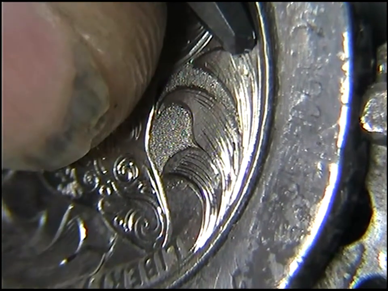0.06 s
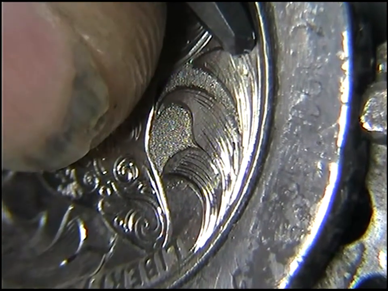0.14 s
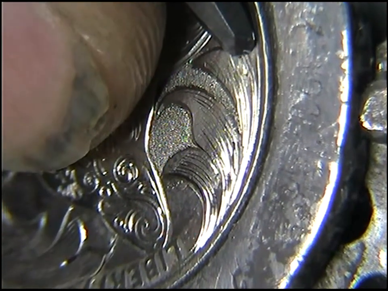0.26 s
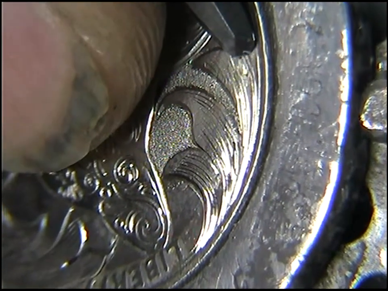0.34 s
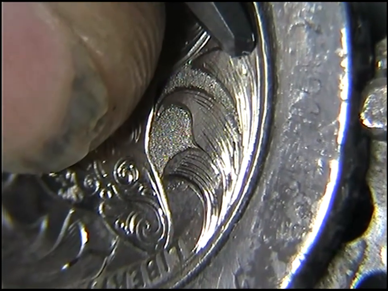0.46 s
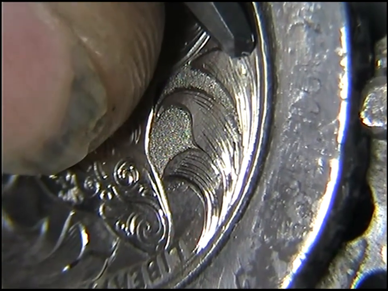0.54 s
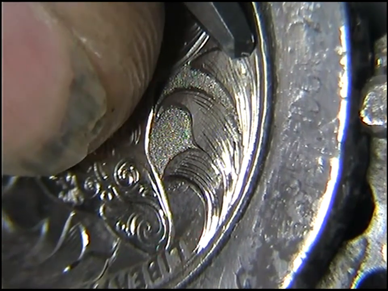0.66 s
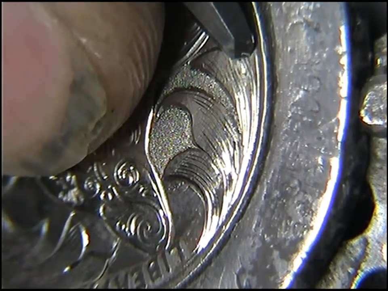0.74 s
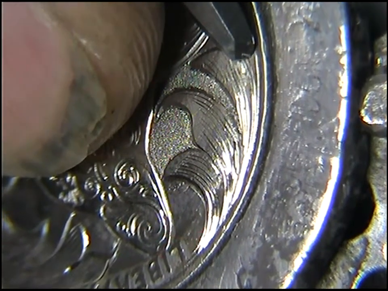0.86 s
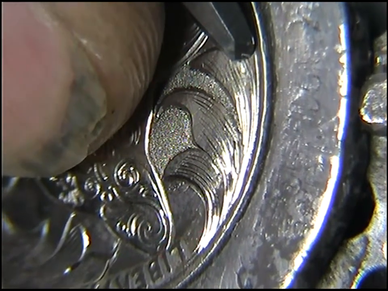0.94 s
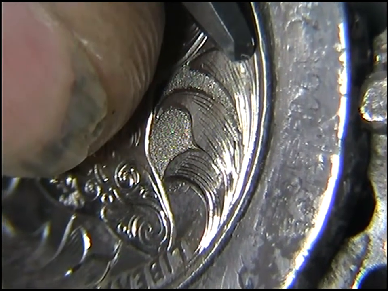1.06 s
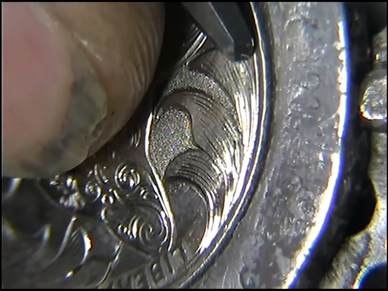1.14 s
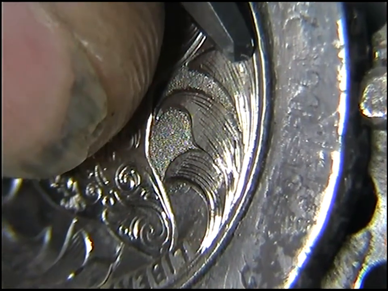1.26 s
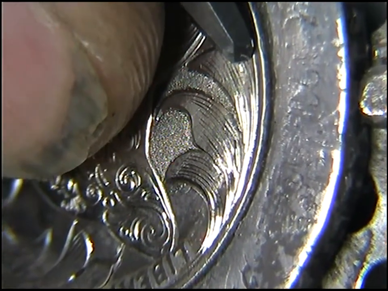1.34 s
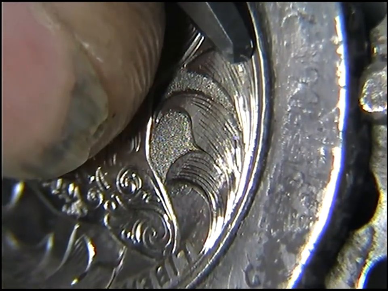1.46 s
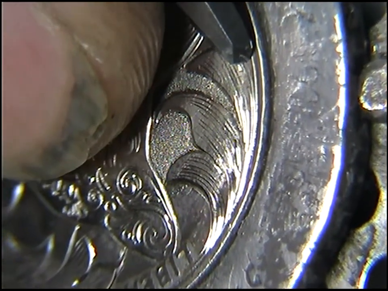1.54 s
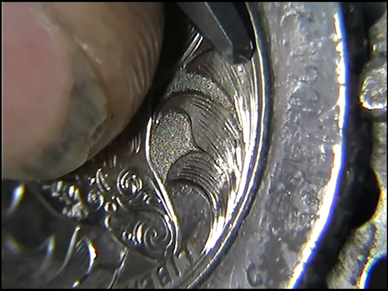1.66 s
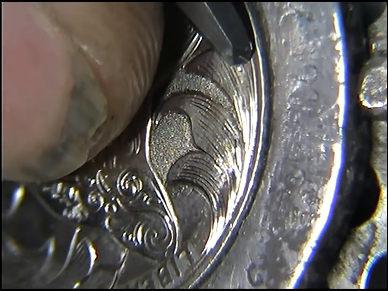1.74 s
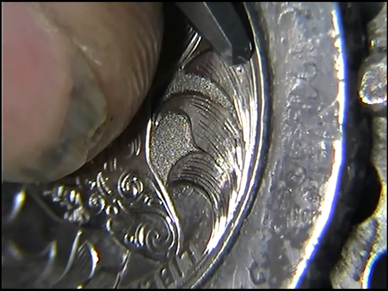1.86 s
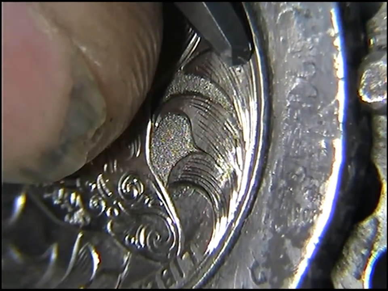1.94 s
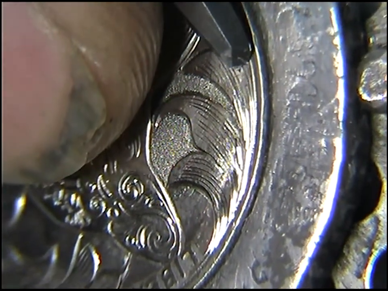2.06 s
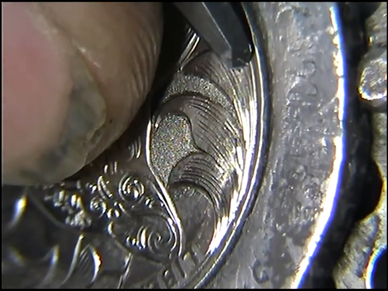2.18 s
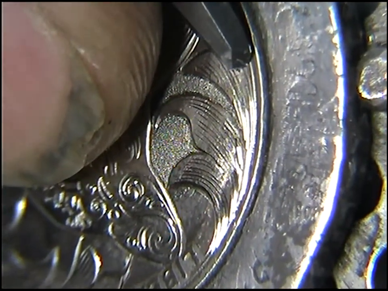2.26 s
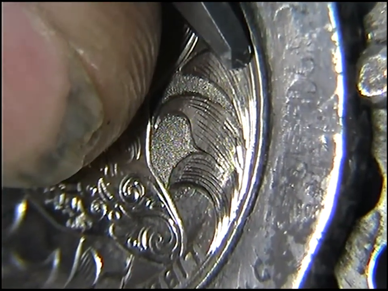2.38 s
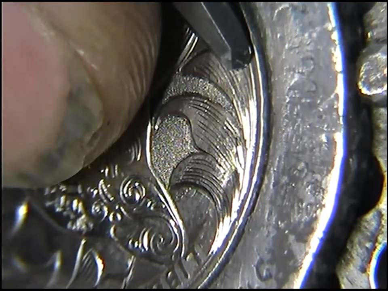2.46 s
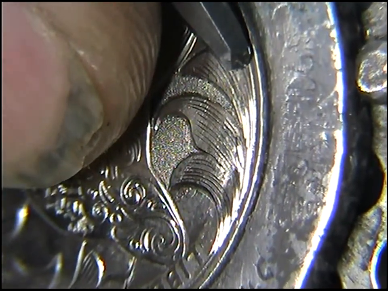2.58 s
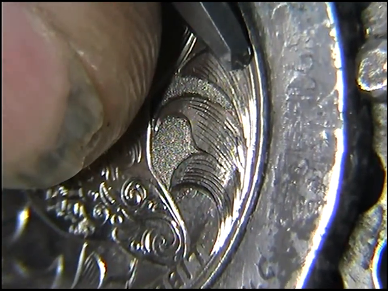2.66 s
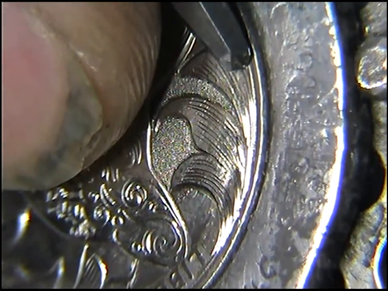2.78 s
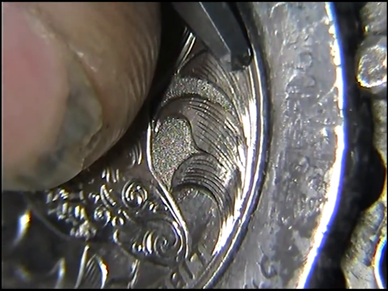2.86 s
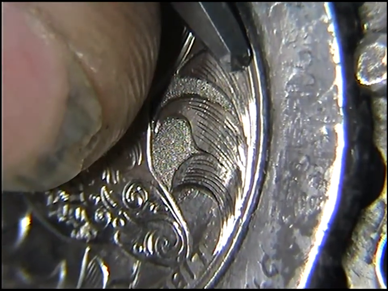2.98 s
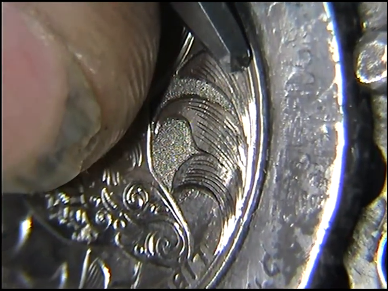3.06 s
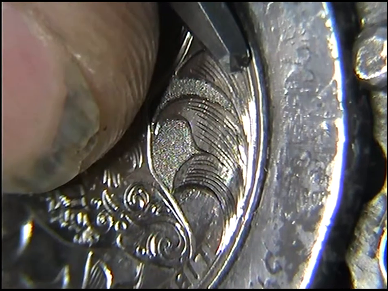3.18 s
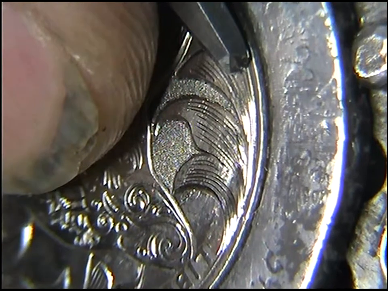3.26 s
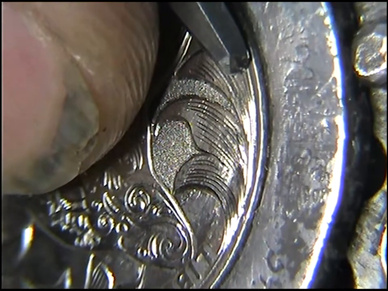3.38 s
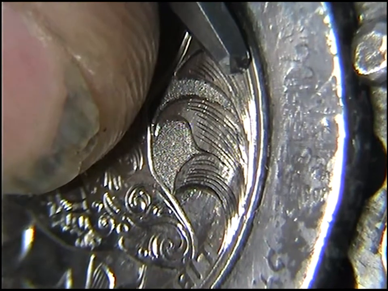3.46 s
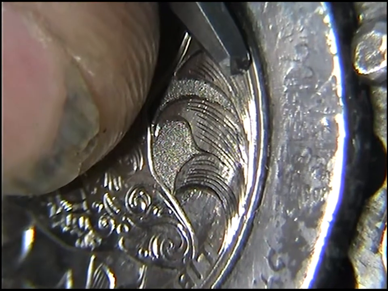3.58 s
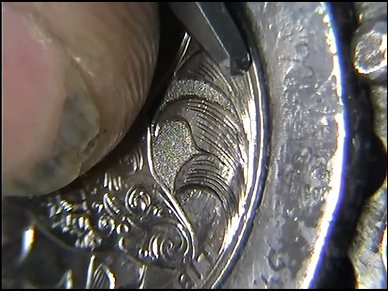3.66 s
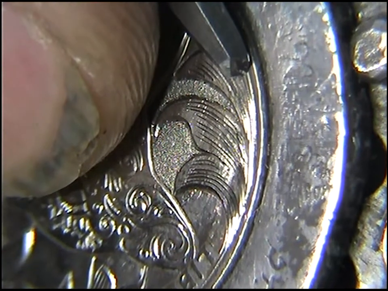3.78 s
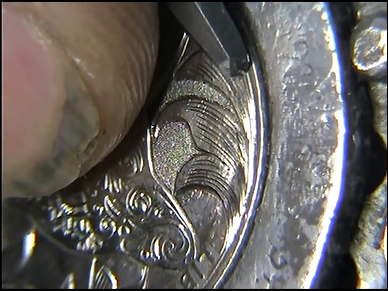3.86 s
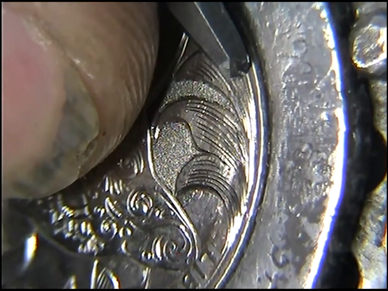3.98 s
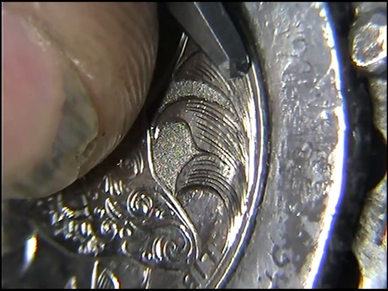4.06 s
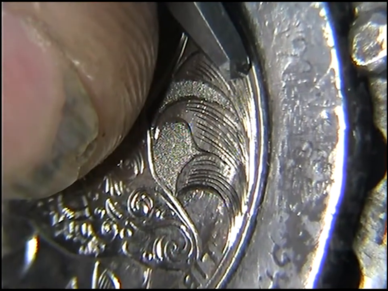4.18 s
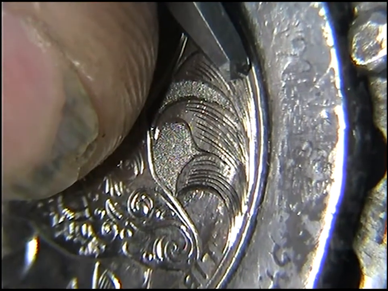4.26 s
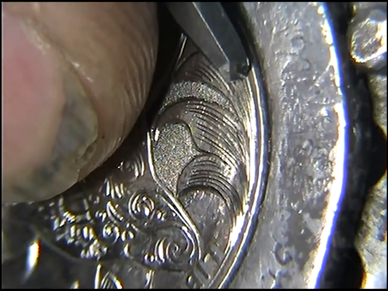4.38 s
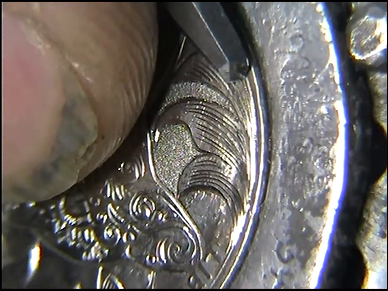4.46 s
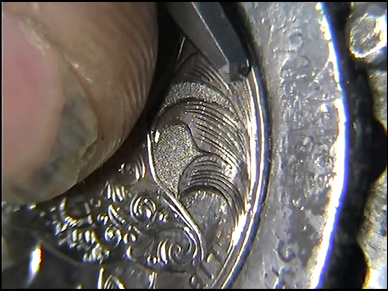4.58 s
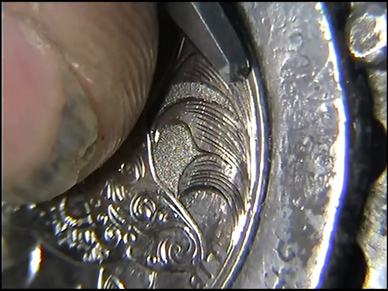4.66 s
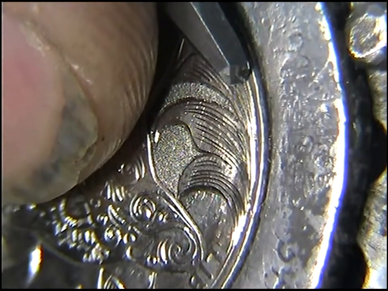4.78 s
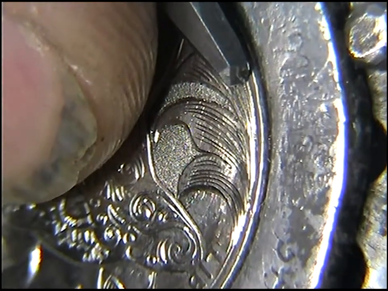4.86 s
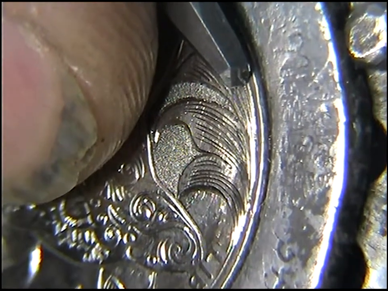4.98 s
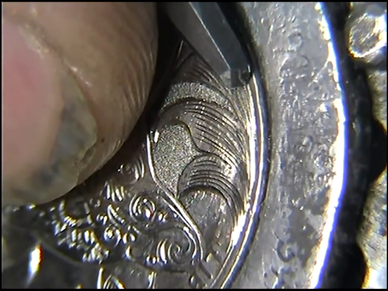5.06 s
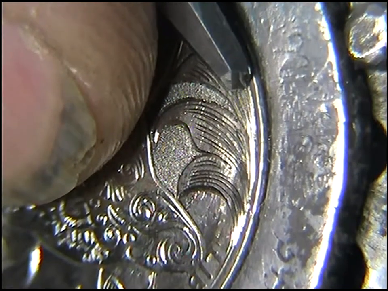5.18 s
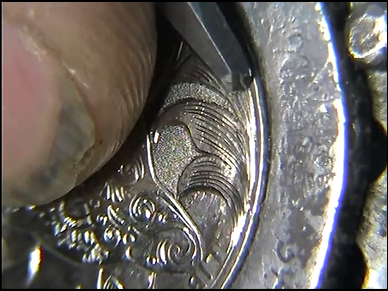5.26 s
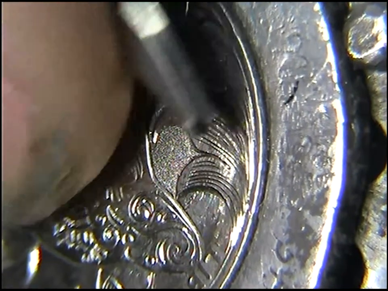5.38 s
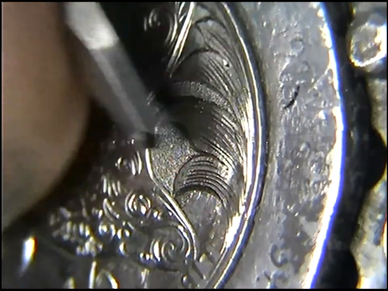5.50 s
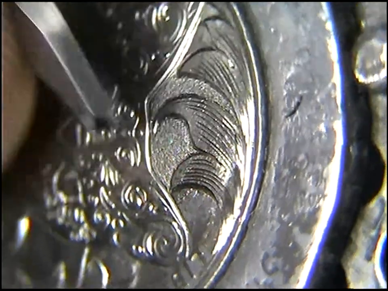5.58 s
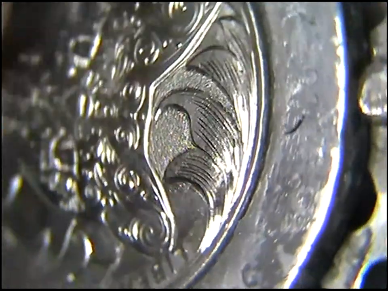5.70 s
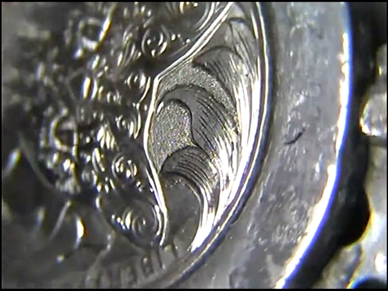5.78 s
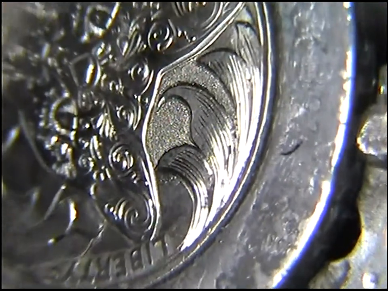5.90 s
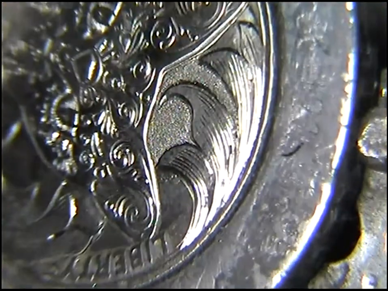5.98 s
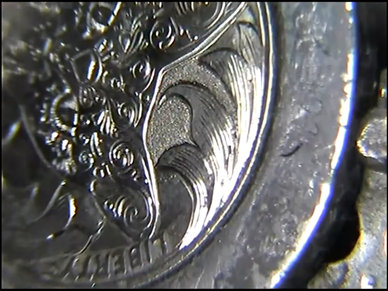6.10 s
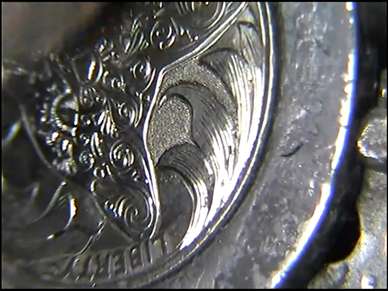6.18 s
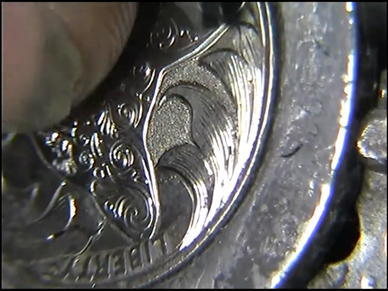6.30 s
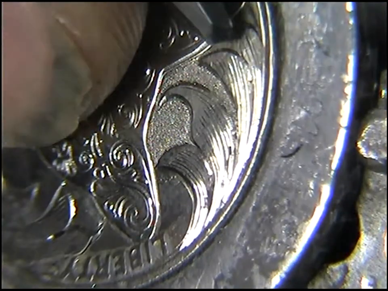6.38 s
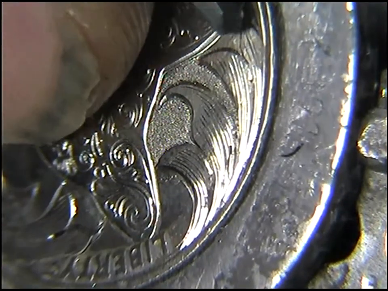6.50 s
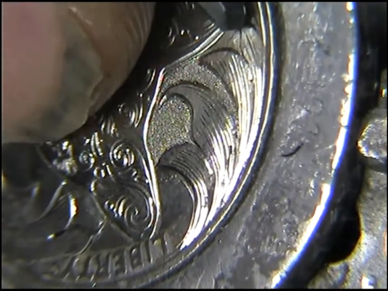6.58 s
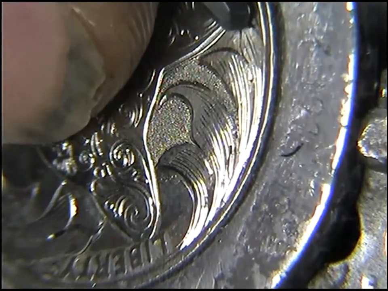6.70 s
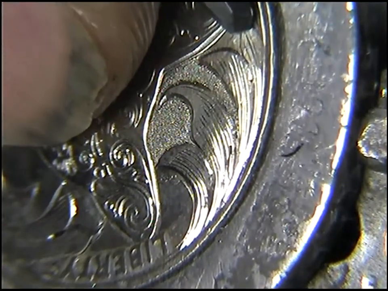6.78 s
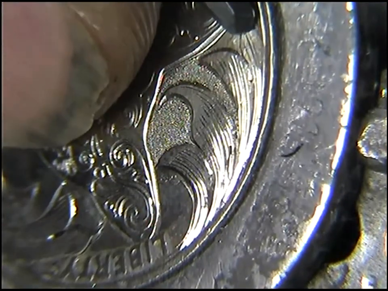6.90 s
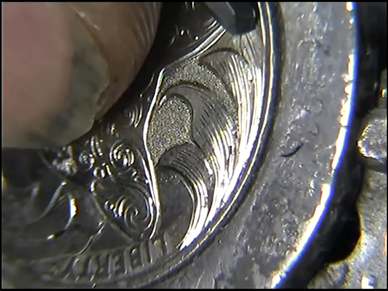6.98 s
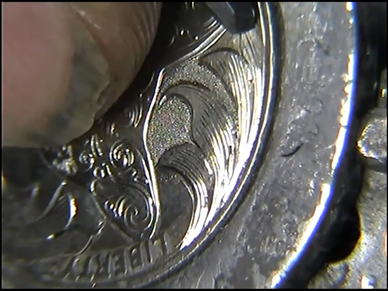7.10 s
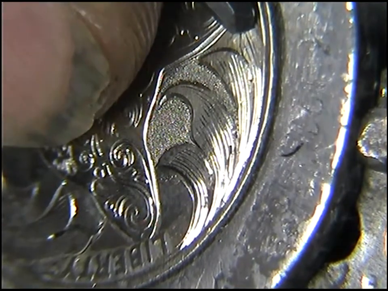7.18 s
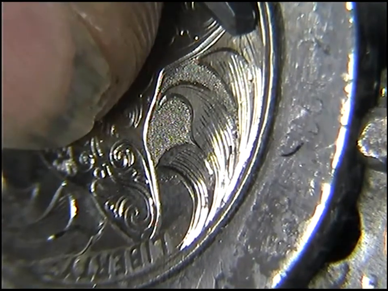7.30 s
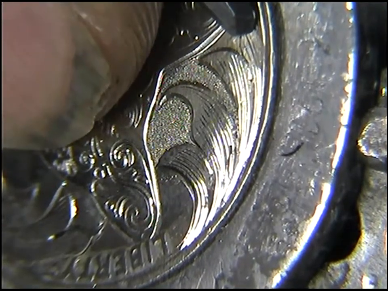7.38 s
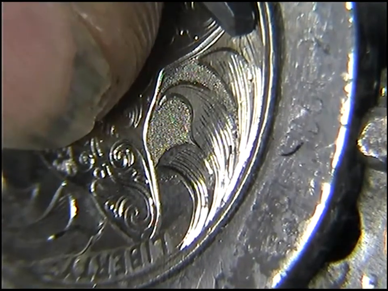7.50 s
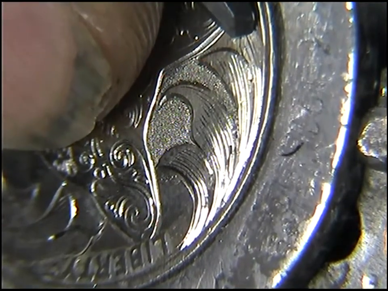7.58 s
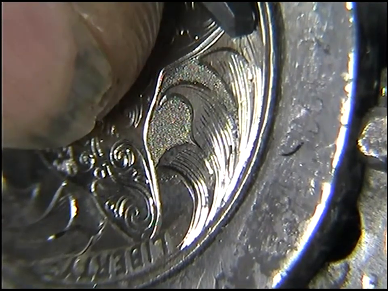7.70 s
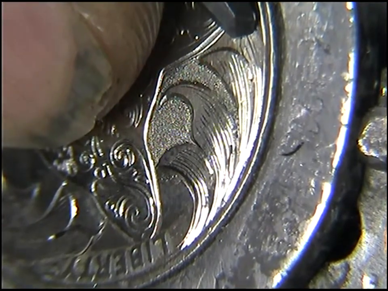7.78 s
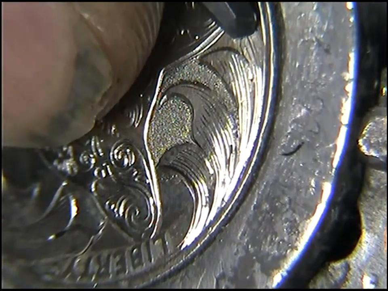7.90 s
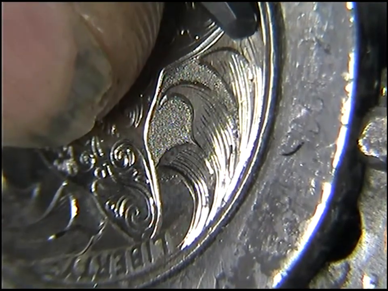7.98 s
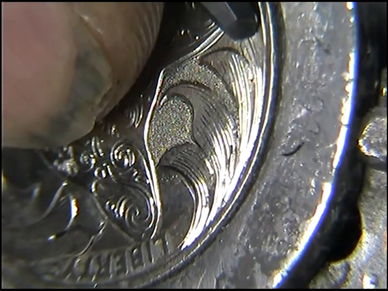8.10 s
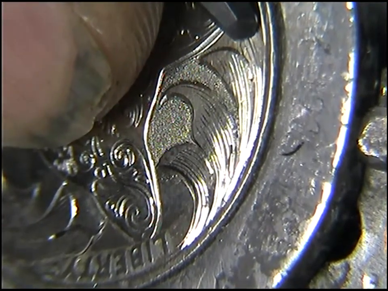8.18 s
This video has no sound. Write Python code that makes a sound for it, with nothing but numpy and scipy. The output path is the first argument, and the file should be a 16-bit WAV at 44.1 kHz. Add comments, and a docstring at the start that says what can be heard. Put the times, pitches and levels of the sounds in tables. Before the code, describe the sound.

From the start a dense, hard metallic buzz fills the foreground, roughly 51 blows a second, ringing brightly around one to three and a half kilohertz with gritty scraping on each blow. Steady exhaust hiss, a small motor's hum near 318 hertz and a low compressor drone lie behind. At 1.0 seconds the compressor cuts out with a short airy puff, then shudders in low, soft lurches until about 2.3, while the hum sags slightly. From 2.5 to 4.6 the buzz gradually changes colour, losing some upper ring; it bites from 4.3, then eases just before 5.3. The tool lifts: a looser, clacking rattle swings close around 5.6 and fades, with hiss and hum more exposed. Near 6.8 a faint buzz returns, swelling steadily and growing firmer after 7.7 to the end. Close stereo microphone, small dry workshop, source slightly right.

```python
"""A dense buzz is heard first: an air-driven graver strikes a coin in a vise about 51 times a second.
Each blow is an impulse that rings the modes of graver, coin and vise; the ring shifts as the cut deepens.
Behind it exhaust air hisses as filtered noise, and a motor and a compressor hum as sums of partials.
After a second the compressor stops with a puff and a shudder. Later the graver lifts off, rattles free
as it swings past the microphone, grows fainter, then touches the metal again with swelling blows."""
import sys
import numpy as np
from scipy import signal
from scipy.fft import rfft, irfft
from scipy.io import wavfile

SR = 44100
rng = np.random.default_rng(int(sys.argv[2]) if len(sys.argv) > 2 else 0)


def bounce(signal):
    """Save signal as a 16-bit WAV file at the path given by the first command-line argument."""
    frames = np.transpose(np.atleast_2d(signal))
    limited = np.clip(frames, -1, 1)
    pcm = np.round(limited * 32767).astype(np.int16)
    wavfile.write(sys.argv[1], SR, pcm)


N = 363825
T = np.arange(N) / SR  # time [s]
LIFT_S, UNCOVER_S = 5.331, .12  # the point leaves the metal; time the hand takes to come off the work
PUMP_STOP_S = 1.022


def undb(db):
    """Logarithmic level: decibels become an amplitude gain."""
    return 10 ** (np.asarray(db) / 20)


def curve(rows):
    """Linear interpolation: rows (time [s], value) are joined by straight lines."""
    return np.interp(T, *np.transpose(rows))


def ramp(start_s, length_s):
    """Linear growth: rises evenly from 0 to 1, then holds."""
    return np.clip((T - start_s) / length_s, 0, 1)


def unit(x):
    """Normalization of power: scales to rms 1."""
    return x / np.sqrt(np.mean(x ** 2))


def walk(rate):
    """Slow random modulation: straight lines join random values drawn `rate` times a second."""
    knots = rng.standard_normal(2000)
    return np.interp(T * rate, np.arange(len(knots)), knots)


def over_hz(rows, size):
    """Logarithmic frequency scale: rows (frequency [Hz], value) are read on the bins of a transform."""
    hz, value = np.transpose(rows)
    bins_hz = np.fft.rfftfreq(size, 1 / SR)
    return np.interp(np.log(bins_hz + 1), np.log(hz + 1), value)


def noise(colour, spread=.3):
    """Spectral shaping of white noise in stereo; spread is the part that differs between the ears."""
    spectrum = rfft(rng.standard_normal((2, N))) * undb(over_hz(colour, N))
    mid, side = irfft(spectrum, N)
    return unit(mid) + spread * unit(side) * np.array([[1], [-1]])


def ring(x, modes, column):
    """Modal superposition: resonances of alternating sign sum to an impulse response of unit energy."""
    f = np.fft.rfftfreq(8192, 1 / SR)
    response = 0
    for k, mode in enumerate(modes):
        hz, width = mode[:2]
        resonance = 1j * f * width / (hz ** 2 - f ** 2 + 1j * f * width)
        response = response + (-1) ** k * undb(mode[column]) * resonance
    h = irfft(response)
    return signal.oaconvolve(x, h[None] / np.linalg.norm(h), axes=1)[:, :N]


# stroke rate of the piston: (time [s], rate [Hz])
STROKE_RATE = [(0, 51.42), (3.2, 51.322), (5.6, 51.47), (6.0, 51.65), (6.6, 51.43), (8.25, 51.345)]
FIRST_BLOW_S = .0068


def strokes(swing_s, jitter_s, scatter_db):
    """Periodic impulsive excitation; the rotary valve's two ports make gaps alternately long and short."""
    turns = np.cumsum(curve(STROKE_RATE)) / SR
    stroke = np.arange(int(turns[-1]) + 1)
    chance = rng.standard_normal((len(stroke), 2))
    even_s = np.interp(stroke, turns, T) + FIRST_BLOW_S
    at = (even_s - swing_s * (-1) ** stroke + jitter_s * chance[:, 0]) * SR
    # a windowed sinc places each push between samples
    taps = at.astype(int)[:, None] + np.arange(-8, 9)
    offset = taps - at[:, None]
    shape = np.sinc(offset) * np.sinc(offset / 10)
    pushes = np.zeros(N)
    np.add.at(pushes, np.clip(taps, 0, N - 1), shape * undb(scatter_db * chance[:, 1:]))
    return unit(pushes)


def rebound(x, share, lag_s, drift_s=.00002):
    """Delayed second impact: the piston bounces; the gap drifts with the pressure of the hand."""
    echo = np.interp(T - lag_s - drift_s * walk(2.47), T, x)
    return x + share * echo


def scrape(pushes, decay_s, edge_hz):
    """Frictional noise: bright grit follows each blow as metal slides on metal, its energy decaying."""
    energy = signal.lfilter([1], [1, -np.exp(-1 / (decay_s * SR))], pushes ** 2)
    highpass = signal.butter(2, edge_hz, "high", fs=SR, output="sos")
    grit = signal.sosfilt(highpass, rng.standard_normal((2, N)))
    return unit(grit * np.sqrt(energy))


SINK_START_S, SINK_S = 2.5, 2.1


def cut_depth():
    """Steady penetration: relative depth of the point in the metal, 0 to 1."""
    return ramp(SINK_START_S, SINK_S)


# modes of graver, coin and vise pressed together:
# (frequency [Hz], width [Hz], relative level in a shallow cut [dB], in a deep cut [dB])
CUT_MODES = [(104, 29, -7.5, -5), (153.7, 8, -3.5, -1), (371, 25, 9, 9), (568.1, 6.7, 9, 11.5),
             (938, 152, 13.5, 16.5), (1169, 258, 17.5, 19.5), (1188.7, 56.3, 22.5, 26.5),
             (1318, 31, 19, 15), (1403, 154, 16, 15.5), (1595, 36, 16, 18), (1912, 98, 20, 19.5),
             (2134, 20, 17.5, 16.5), (2907, 65, 24, 25), (3140, 138, 21, 24.5), (3125, 368, 25.5, 25),
             (3307, 110, 15.5, 7), (3490, 130, 21, 9), (3548, 275, 23, 12.5), (5187, 180, 12.5, 1),
             (5330, 900, 5.5, -5), (5753, 116, 12.5, 13), (6720, 170, 6, 0.5), (7410, 330, 6, 6.5),
             (9191, 486, 16, 14.5), (9343, 654, 15, 13.5), (11970, 520, 0.2, -18), (11920, 1200, -2, -1.5),
             (13900, 500, 6.5, 9), (14450, 1500, -5.5, -6)]
# modes added when the point bites: (frequency [Hz], width [Hz], relative level [dB])
BITE_MODES = [(593, 70, 2.5), (830, 210, -3.5), (4870, 1100, -7), (6080, 770, 2.5), (6840, 360, 1.5),
              (13070, 280, -14), (13520, 820, -2.5)]
# bare clack of the piston: (frequency [Hz], width [Hz], relative level [dB])
CLACK_MODES = [(3630, 5000, 0)]
# drive of the blows, and their easing just before the lift
CUT_DB, EASE_S, EASE_DB = -23.5, .16, -3
# near the end of the cut the point bites, holds, and lets go as the blows ease
BITE_START_S, BITE_RISE_S = 4.34, 0.61
SHALLOW_BITE_DB, BITE_DB, BITE_EASE_DB = -49.5, -31.5, -5
BITE_DAMP_DB = -0.9  # the biting point damps the ring of coin and vise


def cutting():
    """Forced vibration of coupled bodies: blows pass through the point into coin and vise."""
    pushes = strokes(swing_s=.000053, jitter_s=.000012, scatter_db=.2) * (T < LIFT_S)
    blows = unit(rebound(pushes, share=0.22, lag_s=0.000604))
    grit = scrape(pushes, decay_s=.0011, edge_hz=7500)
    drive = blows + undb(1.5) * grit
    easing = ramp(LIFT_S - EASE_S, EASE_S)
    force = undb(CUT_DB + EASE_DB * easing)
    biting = ramp(BITE_START_S, BITE_RISE_S)
    bite_db = SHALLOW_BITE_DB + (BITE_DB - SHALLOW_BITE_DB) * biting
    bite = undb(bite_db + BITE_EASE_DB * easing)
    depth = cut_depth()
    shallow = ring(drive * force * (1 - depth), CUT_MODES, column=2)
    deep = ring(drive * force * depth, CUT_MODES, column=3)
    body = (shallow + deep) * undb(BITE_DAMP_DB * biting ** 2)
    clack = undb(-16.0) * ring(blows[None] * force, CLACK_MODES, column=2)
    return body - clack + ring(drive * bite, BITE_MODES, column=2)


# middle of the pass, time spent closest, and time from there until the gain has fallen by 3 dB
PASS_S, PASS_LINGER_S, PASS_WIDTH_S = 5.59, 0.14, 0.12


def nearness():
    """Inverse-distance law: gain of the handpiece as it swings in, lingers and swings away; 1 when closest."""
    away_s = np.maximum(abs(T - PASS_S) - PASS_LINGER_S / 2, 0)
    return 1 / np.hypot(1, away_s / PASS_WIDTH_S)


# spectrum of exhaust air and workshop: (frequency [Hz], relative density [dB per Hz])
AIR_COLOUR = [(18, -63), (30, -39), (153, -11.5), (233, -15), (311, -13.5), (461, -14), (721, -14.5),
              (1010, -15), (1280, -12.5), (2480, -10), (2900, -14), (3870, -12.5), (6720, -14), (9460, -16),
              (16000, -40)]
# resonances that the escaping air excites: (frequency [Hz], width [Hz], relative level [dB])
VENT_MODES = [(4200, 35, 5), (5230, 300, -4), (5910, 59, -2), (6570, 810, 2), (6700, 28, -4),
              (7240, 28, -11), (7330, 23, 5), (8600, 71, 5), (9000, 29, -2), (9600, 130, 4)]
# vents over a shallow cut, over a deep cut, uncovered, and the extra hiss when closest
VENT_SHALLOW_DB, VENT_DEEP_DB, VENT_OPEN_DB, PASS_VENT_DB = -52.5, -51, -39.5, -45


def exhaust():
    """Turbulent jet noise: spent air excites narrow vents, louder uncovered and as the handpiece nears."""
    vents = ring(rng.standard_normal((2, N)), VENT_MODES, column=2)
    uncovered = ramp(LIFT_S, UNCOVER_S)
    on_work = undb(VENT_SHALLOW_DB + (VENT_DEEP_DB - VENT_SHALLOW_DB) * cut_depth())
    in_air = undb(VENT_OPEN_DB) + undb(PASS_VENT_DB) * nearness() ** 2
    steady = noise(AIR_COLOUR, spread=0.41) * undb(-39.5 + .5 * walk(6.6))
    return steady + vents * (on_work * (1 - uncovered) + in_air * uncovered)


# partials of the motor: (multiple of the hum frequency, relative level [dB])
HUM_PARTIALS = [(.575, -69), (1, -51), (2, -60), (2.293, -55), (6.67, -59), (7.33, -61), (8.485, -62),
                (9.465, -63.5), (10.47, -65)]
# the hum sags after the compressor stops, then slowly recovers part of the way
HUM_HZ, SAG_HZ, RECOVER_HZ = 317.6, 8.9, 4.4
SAG_S, RECOVER_START_S, RECOVER_S = 1.3, 3.3, 3.2
HUM_SCREENED_DB, HUM_OPEN_DB = -1.5, 5


def motor():
    """Additive partials of a small motor: a wavering hum, partly screened until the hand leaves the work."""
    sag = SAG_HZ * ramp(PUMP_STOP_S, SAG_S)
    hz = HUM_HZ - sag + RECOVER_HZ * ramp(RECOVER_START_S, RECOVER_S)
    phase = 2 * np.pi * np.cumsum(hz + 0.645 * walk(8.1)) / SR
    tones = 0
    for multiple, db in HUM_PARTIALS:
        level = undb(db + 0.59 * walk(5))
        tones = tones + level * np.sin(multiple * phase + rng.uniform(0, 2 * np.pi))
    screen_db = HUM_SCREENED_DB + (HUM_OPEN_DB - HUM_SCREENED_DB) * ramp(LIFT_S, UNCOVER_S)
    return np.sqrt(2) * tones * undb(screen_db)


LURCH_RISE_S, LURCH_DECAY_S = 0.065, 0.12


def lurch(at_s):
    """Exponential transient: one lurch swells quickly and dies away."""
    return np.exp(-np.maximum((at_s - T) / LURCH_RISE_S, (T - at_s) / LURCH_DECAY_S))


# partials of the running compressor: (multiple of its stroke rate, level [dB])
PUMP_PARTIALS = [(1, -61), (2, -56.5), (3, -47), (4, -49), (5, -51.5), (6, -67), (7, -58), (8, -53),
                 (9, -57.5), (13.11, -50)]
# spectrum of its relief puff: (frequency [Hz], relative density [dB per Hz])
PUFF_COLOUR = [(240, -49), (400, -29), (1210, -7), (1470, -7), (1720, -3), (2510, -11), (3550, -5.5),
               (6920, -11), (15000, -32)]
# spectrum of its shudder: (frequency [Hz], relative density [dB per Hz])
SHUDDER_COLOUR = [(25, -19), (70, -22), (110, -9), (160, -4.5), (260, -14.5), (420, -16.5), (900, -15.5),
                  (2000, -37)]
# lurches as it comes to rest: (time [s], level [dB])
LURCHES = [(1.07, -41.5), (1.4, -40.5), (1.69, -41), (2.0, -47), (2.2, -51)]
PUMP_HZ = 48.44
TREMBLE_DB, TREMBLE_DECAY_S = -51.5, .9  # trembling beneath the lurches


def compressor():
    """Periodic drone and free decay: the pump drones, cuts out, vents its head and shudders to rest."""
    phase = 2 * np.pi * PUMP_HZ * T
    drone = 0
    for multiple, db in PUMP_PARTIALS:
        level = np.sqrt(2) * undb(db + .7 * walk(7.7))
        drone = drone + level * np.sin(multiple * phase + rng.uniform(0, 2 * np.pi))
    since = np.maximum(T - PUMP_STOP_S, 0)
    opening = 1 - np.exp(-since / .002)
    puff = noise(PUFF_COLOUR, spread=.5) * opening * np.exp(-since / 0.025)
    tremble = undb(TREMBLE_DB) * opening * np.exp(-since / TREMBLE_DECAY_S)
    shaking = sum(undb(db) * lurch(at_s) for at_s, db in LURCHES) + tremble
    shudder = noise(SHUDDER_COLOUR, spread=0.13) * shaking * undb(1.8 * walk(22.1))
    return drone * np.exp(-since / 0.09) + undb(-12.0) * puff + shudder


# modes of the handpiece on its own:
# (frequency [Hz], width [Hz], relative level in the air [dB], just touching [dB])
HAND_MODES = [(570, 78, 6, 17.5), (1144, 100, 10.5, 9), (1316, 64, 18, 15), (1633, 100, 16.5, 17),
              (1805, 290, 16.5, 17.5), (2130, 100, 8, -3), (2335, 21, 12, 7), (3038, 490, 19, 30),
              (3120, 260, 20, 27.5), (3198, 24, 20, 25.5), (3580, 310, 18, 25), (4970, 910, 1.5, -3),
              (5235, 560, 15, 17.5), (5510, 440, 7, 19.5), (6700, 720, 7, 6.5), (7270, 160, 9, 12),
              (8560, 3200, 2, -4), (14600, 1000, -21, -15)]
# the graver's own overtones, free to ring when it barely touches:
# (frequency [Hz], width [Hz], relative level [dB])
POINT_MODES = [(9100, 800, 0), (9630, 320, 5), (13400, 940, -8)]
PASS_DB = -25  # drive of the free handpiece when closest
# the point settles on the coin again, and the blows swell as the air is fed back in
TOUCH_START_S, TOUCH_RISE_S, TOUCH_DB, SWELL_DB_PER_S = 6.766, 0.32, -40, 7.5
FEED_START_S, FEED_RISE_S, FEED_DB = 7.69, 0.37, 4  # a firmer feed of air for the next cut


def lifted():
    """Change of boundary condition: the free handpiece clacks; a light touch brings back the point's ring."""
    pushes = strokes(swing_s=.000095, jitter_s=.00002, scatter_db=.3)
    grit = undb(4) * scrape(pushes, decay_s=0.0015, edge_hz=4900)
    touch = ramp(TOUCH_START_S, TOUCH_RISE_S)
    swell_db = SWELL_DB_PER_S * (T - TOUCH_START_S)
    force = undb(TOUCH_DB + swell_db + FEED_DB * ramp(FEED_START_S, FEED_RISE_S))
    in_air = nearness() * (T >= LIFT_S) * (1 - touch)
    loose = (pushes + undb(-1) * grit) * undb(PASS_DB) * in_air
    rattle = undb(-1.0) * ring(loose, HAND_MODES, column=2)
    clack = undb(-4.0) * ring(loose, CLACK_MODES, column=2)
    pressed = (rebound(pushes, share=0.36, lag_s=0.00064) + grit) * force * touch
    resting = ring(pressed, HAND_MODES, column=3)
    # pressing harder damps the overtones, so they grow more slowly than the blows
    point = ring((pushes + grit) * np.sqrt(force) * touch, POINT_MODES, column=2)
    return rattle - clack + undb(-3.0) * resting + undb(-31.5) * point


def workshop(x, t60_s, room_db):
    """Exponential reverberation: dense, short reflections from bench and walls, different at each ear."""
    t = T[:SR // 2]
    envelope = undb(-60 * t / t60_s) * (1 - np.exp(-t / 0.0012))
    tail = rng.standard_normal((2, len(t))) * envelope
    tail = signal.sosfilt(signal.butter(1, 9000, fs=SR, output="sos"), tail)
    tail = tail / np.linalg.norm(tail, axis=1, keepdims=True)
    return x + undb(room_db) * signal.fftconvolve(x, tail, axes=1)[:, :N]


# level between the two capsules at offside 1: (frequency [Hz], left minus right [dB])
PAN = [(60, 0), (250, -6.5), (600, -2.5), (1300, -8), (2000, -4), (3000, -2), (4400, -3.5), (7000, -1),
       (9500, -3.5), (14000, -5.5)]
# phase between the two capsules at offside 1: (frequency [Hz], lead of the left [rad])
LEAD = [(100, 0), (1000, .17), (2000, .35), (3200, .55), (5000, .7), (7700, 1.3), (9700, .9), (13500, 1.6)]


def capsules(x, offside):
    """Interaural level and phase differences: off the axis, each capsule hears its own level and time."""
    half = np.array([[1], [-1]]) * offside / 2
    ears = undb(half * over_hz(PAN, N)) * np.exp(1j * half * over_hz(LEAD, N))
    # dividing by the mean of both ears keeps the overall colour
    return irfft(rfft(x) * ears / abs(ears.mean(axis=0)), N)


def scene():
    """Superposition of sources: the graver close by with its reflections, the machines behind it."""
    graver = capsules(cutting(), offside=0.94) + capsules(lifted(), offside=0.39)
    machines = capsules(exhaust() + motor() + compressor(), offside=0.97)
    return workshop(graver, t60_s=0.091, room_db=-11) + machines


TOP_HZ = 15900


def record(dry):
    """Amplitude limiting and band limiting: the recorder clips at full scale and cuts the top."""
    lowpass = signal.ellip(10, .2, 70, TOP_HZ, fs=SR, output="sos")
    return signal.sosfilt(lowpass, np.clip(dry, -1, 1))


dry = scene()
out = record(dry)
bounce(out)
```